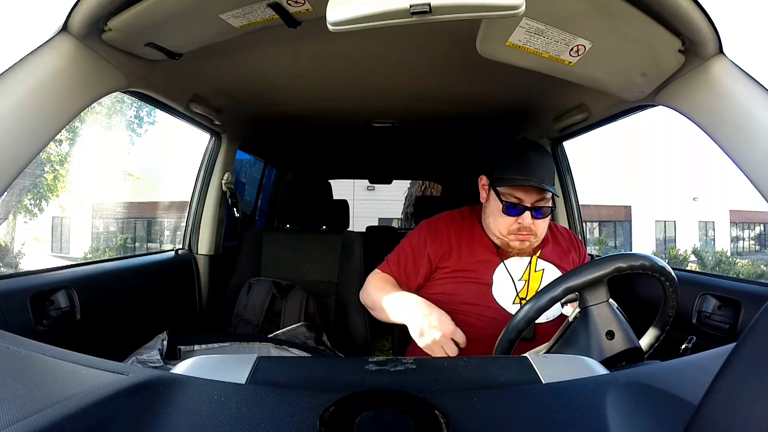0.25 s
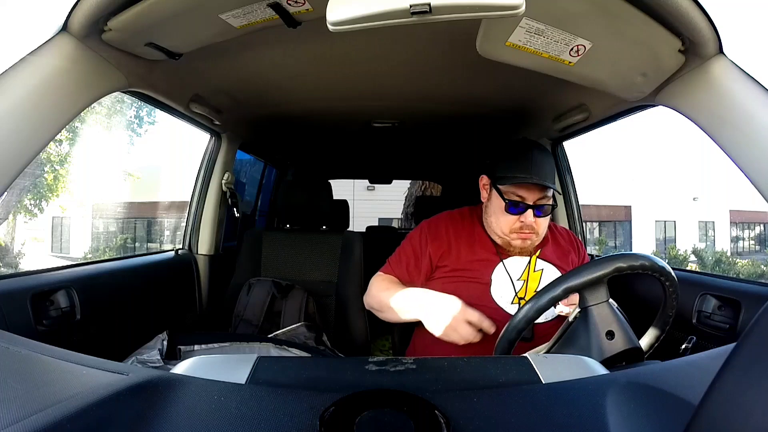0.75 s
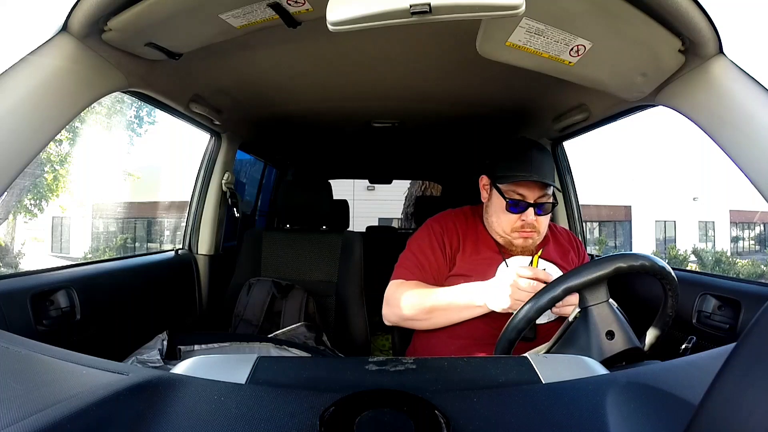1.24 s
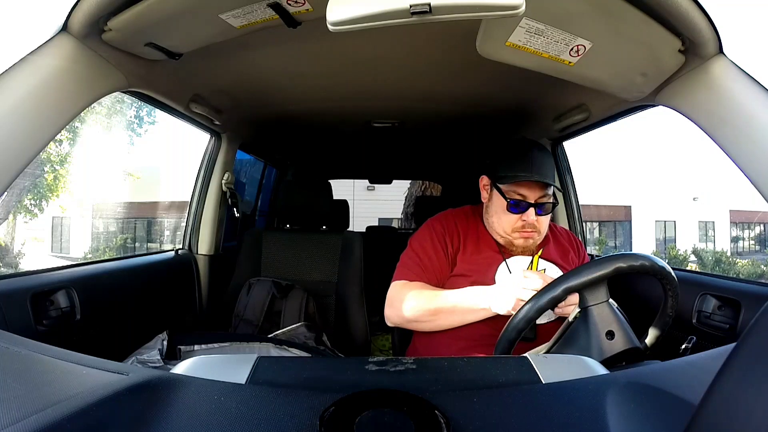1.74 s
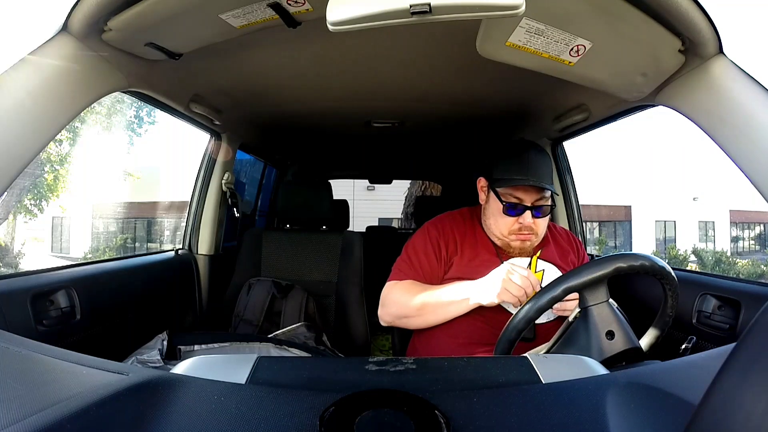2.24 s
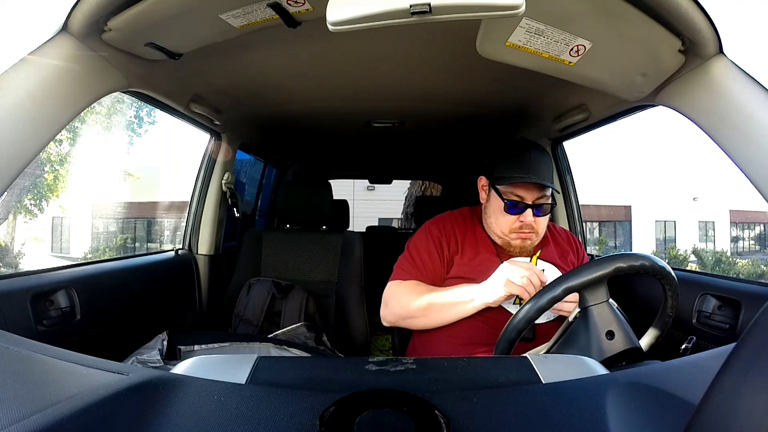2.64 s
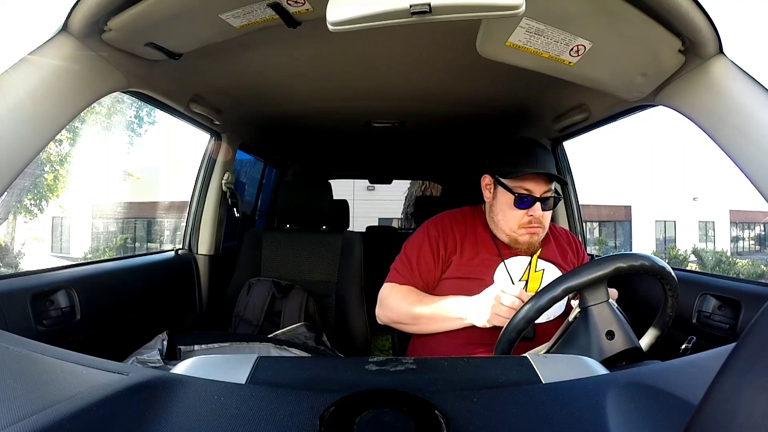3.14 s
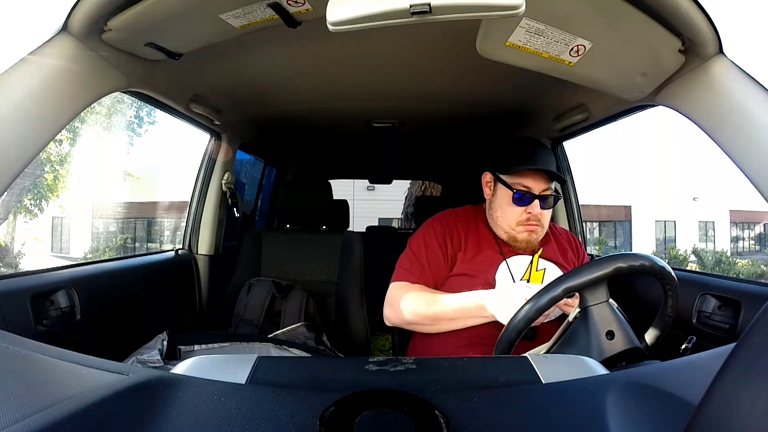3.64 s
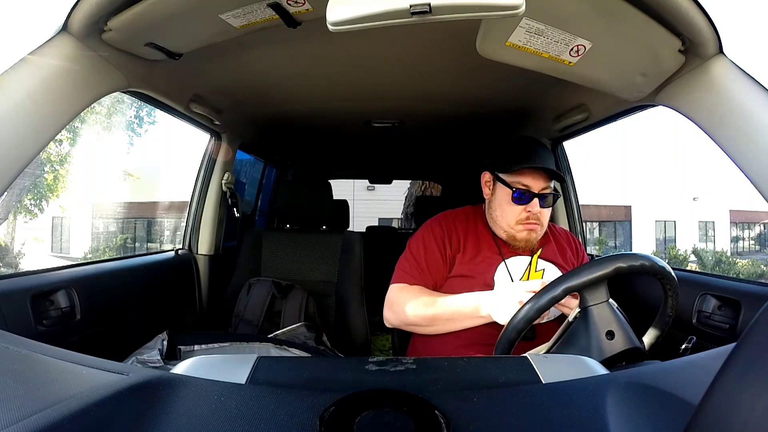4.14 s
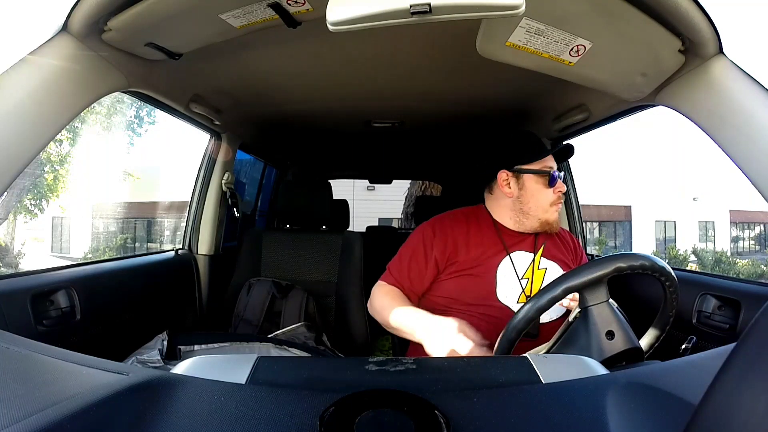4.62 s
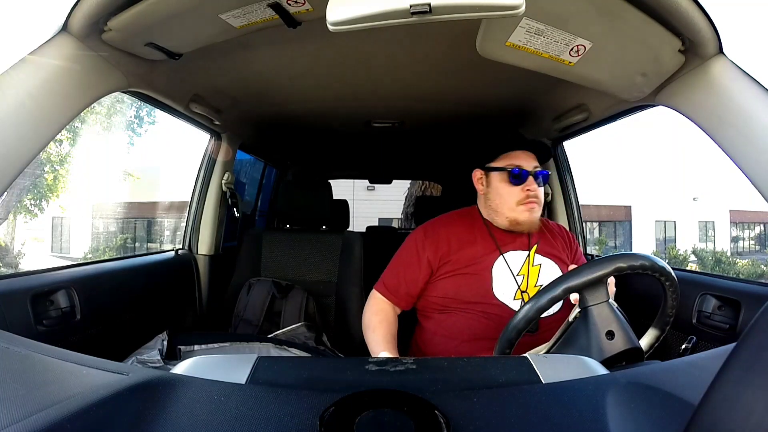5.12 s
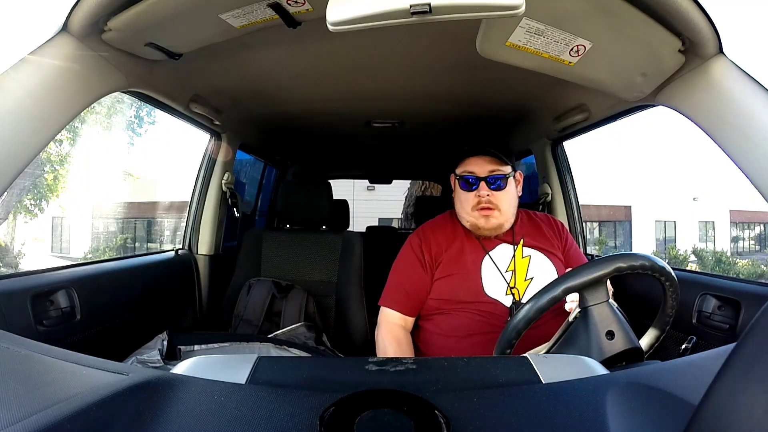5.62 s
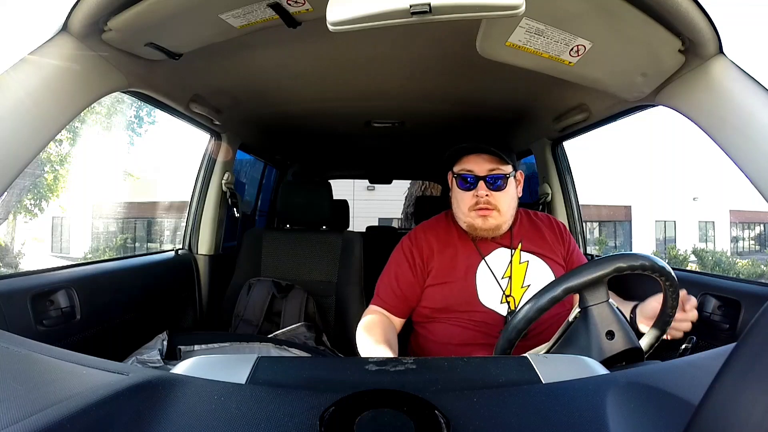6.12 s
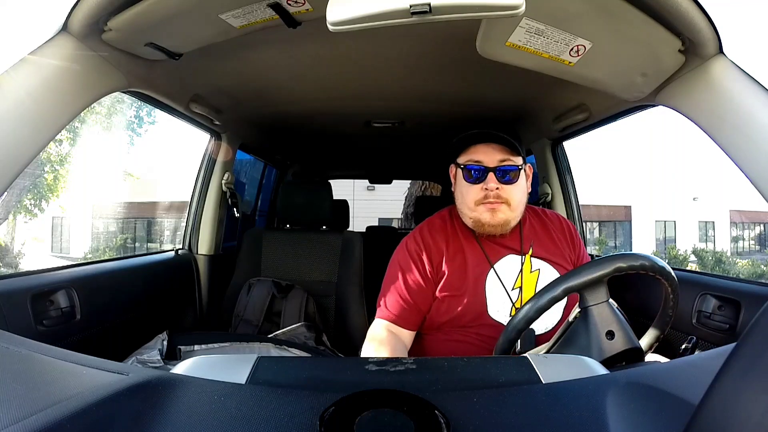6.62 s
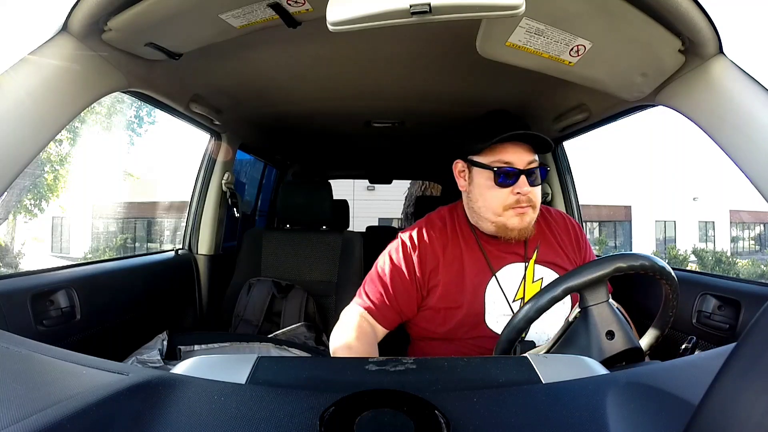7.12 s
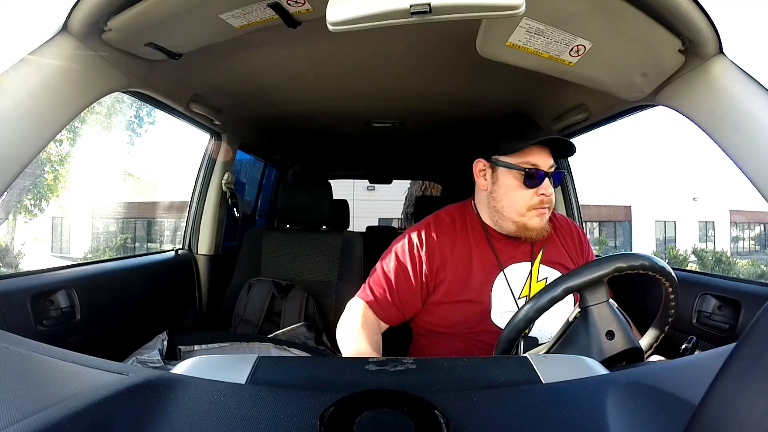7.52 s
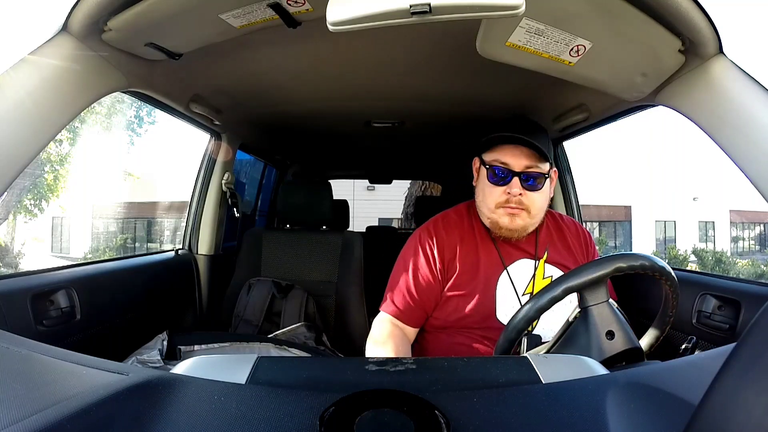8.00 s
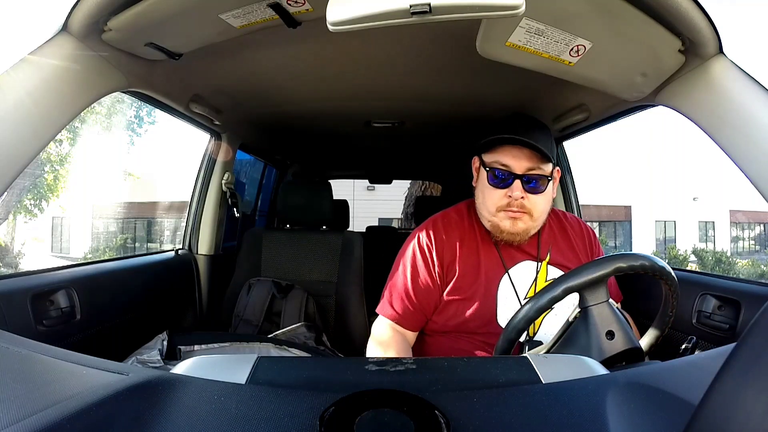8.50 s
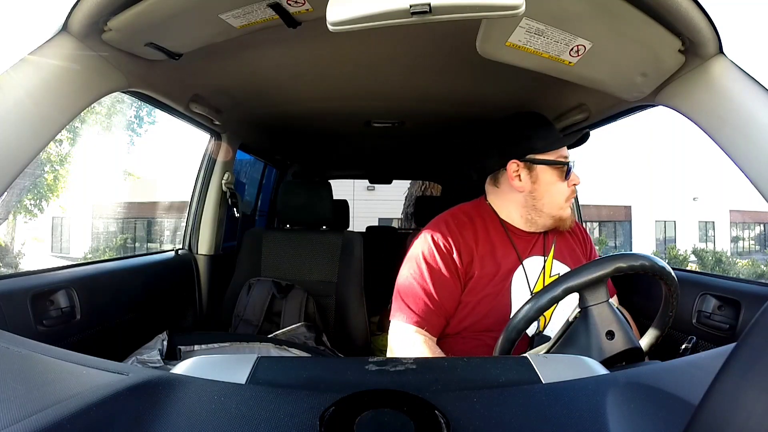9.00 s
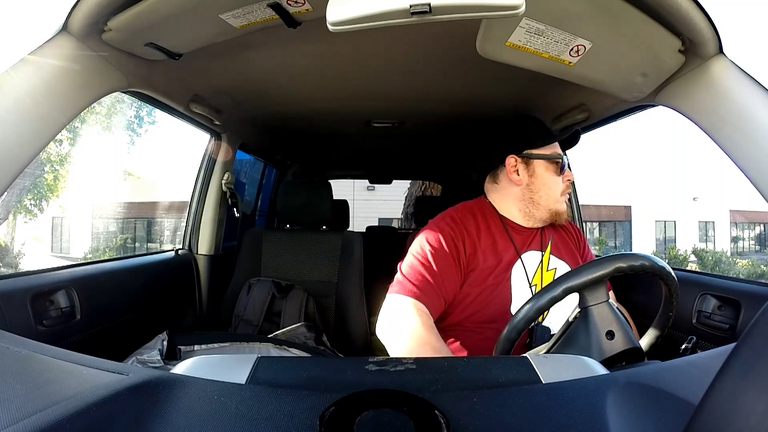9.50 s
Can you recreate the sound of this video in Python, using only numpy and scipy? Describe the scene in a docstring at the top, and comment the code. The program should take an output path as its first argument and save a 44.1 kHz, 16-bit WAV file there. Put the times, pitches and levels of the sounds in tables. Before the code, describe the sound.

From the start, a steady rush of air from a parked car's vents covers the low idle of its engine, heard from the dashboard in a small, padded cabin. A small plastic object gives light, hollow clicks at about 1.9 and 2.7 seconds, then a brighter, sharper snap of a cap closing at 4 seconds. Near 6.9 seconds a switch clicks with a slight ping, followed by a quick run of softer knob ticks. The fan winds down, losing its hiss first, and is gone by about 8 seconds. A much quieter, throbbing idle rumble remains, sagging slightly in pitch. Very faint cloth rustles and sparse trim ticks come as the driver shifts, with clearer ticks and a tiny seat squeak around 9.4 seconds. From 9.5 to 9.7 seconds the car body gives a low, shuddering thud, with one firm latch-like clack at 9.6 seconds.

```python
"""Inside a parked car: turbulent air from the fan rushes through the dash vents over an idling
four-cylinder engine. A small plastic thing clicks in the driver's hands, each contact a crack and a
hollow ring. A switch trips, a knob steps down and the fan coasts to rest, treble first. That leaves the
idle rumble, with cloth rustles, trim ticks, a catch and a low thud of the body as the driver shifts."""
import sys
import numpy as np
from scipy import signal
from scipy.fft import rfft, irfft, next_fast_len
from scipy.io import wavfile
from scipy.ndimage import uniform_filter1d

SR = 44100
rng = np.random.default_rng(int(sys.argv[2]) if len(sys.argv) > 2 else 0)


def unload_audio(sound):
    """Save the sound as a 16-bit wav file, at the path given as the first command line argument."""
    columns = np.transpose(np.atleast_2d(sound))
    # keep every value between -1 and 1, then stretch to whole-number steps
    steps = np.round(np.clip(columns, -1, 1) * 32767)
    wavfile.write(sys.argv[1], SR, steps.astype(np.int16))


N = 429975

# Tone of the rushing air (frequency [Hz], level per Hz [dB])
FAN_TONE = [(7.1, -32.5), (12, -5), (48, 0.5), (173, -9), (201, -8), (248, -10), (366, -14), (524, -22.5),
            (1140, -27.5), (1690, -37), (3260, -41), (6500, -57.5), (7780, -54.5), (14200, -79),
            (15500, -84)]
# Vent and cabin resonances (frequency [Hz], width [Hz], lift [dB])
VENT_RESONANCES = [(210, 17.04, -6.5), (232, 82, 3), (350, 59, 2), (492.5, 73, -1.5), (1023, 62, -5.5),
                   (1130, 140, 2), (1356, 420, -3.5), (2003, 60, 4.5), (2086, 74, -5.5), (2280, 72, 3.5),
                   (2440, 44, -7), (2500, 102, -0.5), (2755, 57, -7.5), (3080, 710, 2), (3520, 130, -2),
                   (3665, 92, 4.5), (3870, 120, -3.5), (5540, 300, -2.5), (5970, 196.5, 3), (6630, 880, -4),
                   (7860, 800, 0), (10860, 1200, 2)]
def fan(off_s=6.87, coast_s=0.61, bearing_drag=0.075):
    """Turbulent air: the bass buffets, the hiss flickers, and the treble dies first as the blades slow."""
    coasting = np.maximum(np.arange(N) / SR - off_s, 0)
    speed = np.clip((1 + bearing_drag) * np.exp(-coasting / coast_s) - bearing_drag, 0, 1)
    bands = coloured_noise(FAN_TONE, -16, VENT_RESONANCES, edges_hz=(110, 450, 1500, 4000, 9000))
    powers = (2.1, 2.53, 2.2, 2.7, 3.8, 3.3)  # each band's pressure goes as a power of the speed
    flicker_db = (0.79, 0.13, 0.22, 0.28, 0.61, 0.8)
    buffet_db = (1.9, 0.76, 0.16, 0, 0.084, 0)
    gust_db, buffet = 0.16 * wander(3.9), wander(9)
    return sum(band * speed ** power * undb(gust_db + flicker * wander(6) + depth * buffet)
               for band, power, flicker, depth in zip(bands, powers, flicker_db, buffet_db))


# The idle, sagging from about 8 s as a load drops away (time [s], firing rate [Hz], first order [dB], second
# order [dB], first order's lead [rad])
IDLE = [(7.6, 27.05, -33, -36, 0.028), (8.05, 26.68, -33.5, -35, 0.065), (8.25, 26.12, -36, -35, .4),
        (8.6, 25.33, -36.5, -34, .55), (9.0, 24.97, -36, -34, .55), (9.45, 24.98, -36.5, -32, .55)]
# Overtones of the idle (multiple of the firing rate, level before the cabin boom [dB])
UPPER_ORDERS = [(4, -57.5), (5, -57), (6, -51), (6.5, -57.5), (7, -59.5), (9, -60.5), (10, -64.5),
                (10.5, -63.5), (12, -63.5), (13, -61.5), (13.5, -59.5), (15, -66.5)]
# Cabin boom that lifts or sinks the third order and up (frequency [Hz], width [Hz], lift [dB])
CABIN_BOOM = [(78.7, 9.4, -12.5), (137, 10, 4.5), (245, 8.8, 10), (333, 14, 8.5)]
# Engine and street rumble through the body (frequency [Hz], level per Hz [dB])
RUMBLE_TONE = [(5, -22.5), (20, -2.5), (45, 1.5), (60, -1), (105, -11), (145, -5.5), (205, -11.5),
               (285, -16), (330, -11.5), (420, -11.5), (470, -18.5), (550, -19.5), (1000, -30),
               (1900, -35.5), (3200, -40), (6500, -50), (12000, -57), (15000, -67.5)]
def engine():
    """Firing orders waver with uneven combustion, over a rumble that throbs once a firing."""
    hz, first_db, second_db, lead = curves(IDLE)
    phase = 2 * np.pi * np.cumsum(hz * (1 + 0.0023 * wander(7.4))) / SR
    third_db = -37 + resonance_db(3 * hz, CABIN_BOOM)
    orders = np.zeros(N)
    # The phase offsets shape the chug of each firing.
    for order, db, offset in [(1, first_db, lead), (2, second_db, -0.75), (3, third_db, 1.4)]:
        orders += undb(db + 0.553 * wander(4.4)) * np.cos(order * phase + offset)
    for order, db in UPPER_ORDERS:
        gain = undb(db + wander(2.8) + resonance_db(order * hz, CABIN_BOOM))
        orders += gain * np.cos(order * phase + rng.uniform(0, 2 * np.pi))
    bands = coloured_noise(RUMBLE_TONE, -42.5, edges_hz=(120, 500, 2500))
    rumble = sum(band * undb(1.1 * wander(6.2)) for band in bands)
    throb = 1 + 0.1196 * np.cos(phase)
    return np.sqrt(2) * orders + throb * rumble


# Noise bands of a click's crack (frequency [Hz], width [Hz], cabin t60 [s])
CRACK_BANDS = [(859, 1100, 0.12), (2760, 2220, 0.065), (5460, 4400, .07), (9140, 3200, 0.05),
               (13600, 4130, .05)]
def clicks(hits, body, detune=0.015, rattle=2.5):
    """Each contact: a crack of a few ms, the part's hollow rings, then the padded cabin's short tail."""
    # hits: (time [s], level [dB], tilt [dB/octave], ring lift [dB]); harder contact tilts brighter
    # body: (crack level per band [dB], rings (frequency [Hz], level [dB]), ring t60 [s], rise [s],
    #        further contacts (delay [s], level [dB]))
    crack_db, rings, ring_t60, rise_s, contacts = body
    out, t = np.zeros(N), np.arange(int(0.2 * SR)) / SR
    crack = [(*band, db) for band, db in zip(CRACK_BANDS, crack_db)]
    attack = np.minimum(t / rise_s, 1)
    spike = np.exp(-np.maximum(t - rise_s, 0) / 0.0029)
    for start_s, level_db, tilt_db, ring_db in hits:
        modes = [(hz, 0, ring_t60, db + ring_db) for hz, db in rings]
        for delay_s, contact_db in [(0, 0)] + contacts:
            i = int((start_s + delay_s) * SR)
            slope_db = tilt_db - 1 if delay_s > 0 else tilt_db  # further contacts are duller
            for hz, width, t60, db in crack + modes:
                envelope = attack * (spike + undb(5) * 1000.0 ** (-t / t60))
                if width:
                    part = band_pass(rng.standard_normal(len(t)) * envelope, hz, width)
                else:  # a ring, roughened by rattle and detuned a little by each grip
                    rough = 1 + rattle * uniform_filter1d(rng.standard_normal(len(t)), size=64)
                    ring_hz = hz * (1 + detune * rng.standard_normal())
                    part = envelope * rough * np.sin(2 * np.pi * (ring_hz * t + rng.random()))
                part /= np.sqrt(np.mean(part[:SR // 70] ** 2))  # unit rms over the first 14 ms
                gain = undb(level_db + contact_db + db + slope_db * np.log2(hz / 2800))
                out[i:i + len(t)] += gain * part[:N - i]
    return out


# Handling clicks and the cap's snap (time [s], level [dB], tilt [dB/octave], ring lift [dB])
HANDLING_HITS = [(1.910, -41, -1, 0), (1.941, -25.5, -1.5, -3.5), (2.664, -26.5, 1.5, -1.5)]
CAP_HITS = [(3.9655, -16.5, 0.01, 0.0011)]
# A hollow shell and a crisp, bright cap (columns as for body in clicks)
SHELL_BODY = [-14, -4, -12, -15, -25], [(1820, -3), (2550, -7), (3150, -11), (3490, -9), (4150, -10.5),
              (4800, -15), (5600, -22)], 0.045, 0.0043, [(.0085, -9.5)]
CAP_BODY = [-14.5, -13.5, -13, -4.5, -13.5], [(800, -20), (1550, -20), (1950, -18.5), (2250, -15),
            (2450, -14), (3500, -21.5), (4300, -21), (11200, -10.5)], 0.052, 0.0007, [(.009, -10)]
def held_plastic():
    """A small plastic thing is worked in the hands, then its cap snaps home."""
    return clicks(HANDLING_HITS, SHELL_BODY) + clicks(CAP_HITS, CAP_BODY)


# One firm clack (time [s], level [dB], tilt [dB/octave], ring lift [dB])
CATCH_HITS = [(9.623, -24, 0, -2.5)]
# A low knock under bright rings (columns as for body in clicks)
CATCH_BODY = [-11.5, -8.5, -12, -14, -23], [(600, -11), (2300, -18), (2640, -14), (3800, -13.5),
              (4400, -12), (5200, -12), (8800, -10)], 0.05, 0.004, [(.011, -8), (.027, -25)]
def catch():
    """A catch near the door clacks, making three quick contacts."""
    return clicks(CATCH_HITS, CATCH_BODY)


# Switch and fan knob clicks (time [s], level [dB], tilt [dB/octave], ring lift [dB])
SWITCH_HITS = [(6.854, -27, 2, -10), (6.859, -24, 1.1, -1.5)]
KNOB_HITS = [(6.910, -39, 1.5, -8), (6.929, -37, -3, 0), (6.990, -38, -2, -9), (7.001, -33, 0.5, 5.5),
             (7.081, -38, 0, -9), (7.092, -28, -4, 1)]
# A pingy switch and a drier knob (columns as for body in clicks)
SWITCH_BODY = [-15, -14, -12, -14, -26], [(2750, -2.5), (2950, -6.5), (3170, -4), (3600, -19), (5200, -16),
               (8030, -16), (9450, -17)], 0.041, 0.0039, [(.008, -7.5)]
KNOB_BODY = [-10, -7.5, -9.5, -16, -30], [(980, -23), (1700, -22), (2400, -20), (3150, -18), (3440, -14),
             (5150, -16)], .04, 0.004, [(.008, -7.5)]
def dash_controls():
    """A finger lands and the switch trips; at each step the knob's spring slips into a detent."""
    return clicks(SWITCH_HITS, SWITCH_BODY) + clicks(KNOB_HITS, KNOB_BODY)


# Soft blows on the car's body (time [s], level [dB])
BLOWS = [(9.497, -19), (9.547, -20), (9.6, -18), (9.655, -23.5), (9.72, -22)]
def thud(lowest_hz=41.6, next_hz=78.3):
    """Each blow swings the cabin air for a couple of cycles at its two lowest resonances."""
    out = np.zeros(N)
    for start_s, db in BLOWS:
        t = np.maximum(np.arange(N) / SR - start_s, 0)
        swing = t / 0.024 * np.exp(1 - t / 0.019)
        modes = np.sin(2 * np.pi * lowest_hz * t) + undb(-8.5) * np.sin(2 * np.pi * next_hz * t)
        out += undb(db) * swing * modes
    return out


# Sparse, faint ticks (time [s], level [dB], tilt [dB/octave], ring lift [dB])
TRIM_HITS = [(7.775, -53.5, 1, 2), (8.90, -55, 1, -4), (9.105, -55, 1, 3), (9.236, -49.5, -4.5, 3),
             (9.342, -66, 2, 1), (9.416, -39.5, 1, -11), (9.442, -40.5, -0.5, 1), (9.451, -44.5, -0.5, 1),
             (9.505, -59, 2, -3)]
# Dull, mid-heavy trim (columns as for body in clicks)
TRIM_BODY = [-5, -13, -24, -31, -39], [(900, -10.5), (1230, -11), (1600, -17), (1950, -14), (2250, -19),
             (2950, -16), (4200, -23), (5400, -26)], 0.055, 0.003, [(.011, -10)]
def trim_ticks():
    """Seat and trim tick as the driver shifts."""
    return clicks(TRIM_HITS, TRIM_BODY)


# Fader ride of the rustle (time [s], level [dB])
RUSTLE_RIDE = [(7.6, -67), (8.1, -62.5), (8.8, -63), (8.9, -62), (9.0, -60), (9.2, -64), (9.4, -66.5),
               (9.75, -65)]
# Its soft, mid-heavy tone (frequency [Hz], level per Hz [dB])
RUSTLE_TONE = [(200, -8), (600, 6), (2000, 1), (5000, -14), (10000, -19.5), (15000, -32)]
def seat_rustle(squeak_at_s=9.468, squeak_length_s=0.045):
    """Cloth rubs on a seat: a patchy hiss and one short, wobbly squeak."""
    ride_db, = curves(RUSTLE_RIDE)
    moving = np.arange(N) / SR > RUSTLE_RIDE[0][0]
    bands = coloured_noise(RUSTLE_TONE, 0, edges_hz=(1500, 5000))
    cloth = sum(band * undb(2.5 * wander(25)) for band in bands)
    squeak_hz = 600 * (1 + 0.06 * wander(90))
    squeak = swell(squeak_at_s, squeak_length_s) * np.sin(2 * np.pi * np.cumsum(squeak_hz) / SR)
    return moving * undb(ride_db) * cloth + undb(-41) * squeak


# Light strokes over cloth (time [s], length [s], level [dB])
STROKES = [(.19, .22, -68), (.65, .1, -69), (5.35, .7, -66), (8.882, 0.04, -70), (8.92, 0.075, -76),
           (9.107, 0.053, -67), (9.497, 0.024, -70)]
# Their airy tone (frequency [Hz], level per Hz [dB])
BRUSH_TONE = [(1000, -20), (2000, -2), (4000, -12), (8000, 0), (10300, -1), (11000, 1), (12000, -6),
              (14500, -6), (15500, -12)]
def sleeve_brush(grain_db=1.5):
    """A hand or sleeve brushes cloth: dry, slightly grainy scuffs that swell and fade."""
    envelope = sum(undb(db) * swell(start_s, length_s) for start_s, length_s, db in STROKES)
    return envelope * coloured_noise(BRUSH_TONE, 0)[0] * undb(grain_db * wander(120))


def undb(db):
    """Gain of a level in dB."""
    return 10 ** (np.asarray(db) / 20)


def curves(table):
    """Columns of a table joined by straight lines in time, held at the ends."""
    times, *columns = np.transpose(table)
    return [np.interp(np.arange(N) / SR, times, column) for column in columns]


def swell(start_s, length_s):
    """A half-sine fade in and out."""
    return np.sin(np.pi * np.clip((np.arange(N) / SR - start_s) / length_s, 0, 1))


def wander(rate_hz):
    """Smooth drift: random steps, slewed twice, with a spread near 1."""
    hold = int(SR / rate_hz)
    steps = np.repeat(rng.standard_normal(N // hold + 1), hold)
    return 1.3 * uniform_filter1d(uniform_filter1d(steps, hold), hold)[:N]


def resonance_db(hz, peaks):
    """Lift or dip that a set of resonances gives a frequency."""
    return sum(lift_db / (1 + (2 * (hz - centre) / width) ** 2) for centre, width, lift_db in peaks)


def coloured_noise(tone, rms_db, peaks=(), edges_hz=()):
    """Noise of a given tone and overall level, split into bands at the edges."""
    size = next_fast_len(N)
    hz = np.arange(1, size // 2 + 2) * SR / size
    tone_hz, tone_db = np.transpose(tone)
    shape_db = np.interp(np.log(hz), np.log(tone_hz), tone_db) + resonance_db(hz, peaks)
    spectrum = rfft(rng.standard_normal(size)) * undb(shape_db)
    spectrum *= undb(rms_db) / irfft(spectrum, size).std()
    band = np.searchsorted(edges_hz, hz)
    return [irfft(spectrum * (band == k), size)[:N] for k in range(len(edges_hz) + 1)]


def band_pass(x, hz, width):
    """Fourth-order band-pass around hz."""
    edges = np.clip([hz - width / 2, hz + width / 2], 10, SR / 2.2)
    return signal.sosfilt(signal.butter(2, edges, "band", fs=SR, output="sos"), x)


def scene():
    """The mono mix, heard from the dash."""
    clicking = held_plastic() + catch() + dash_controls() + trim_ticks()
    return (fan() + engine() + seat_rustle() + sleeve_brush() + clicking + thud())[None]


def record(dry, top_hz=15400):
    """A steep high cut takes off the very top."""
    return signal.sosfilt(signal.ellip(10, 0.2, 80, top_hz, fs=SR, output="sos"), dry)


dry = scene()
out = record(dry)
unload_audio(out)
```